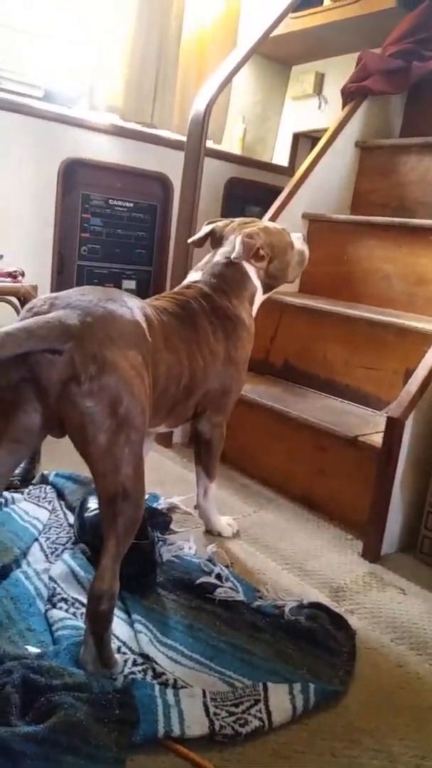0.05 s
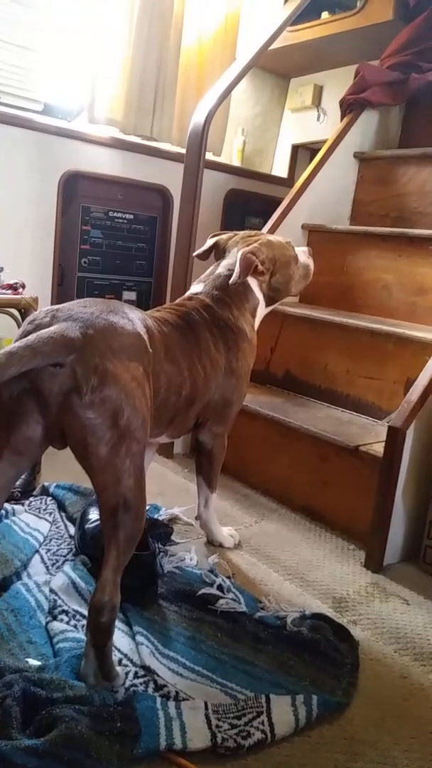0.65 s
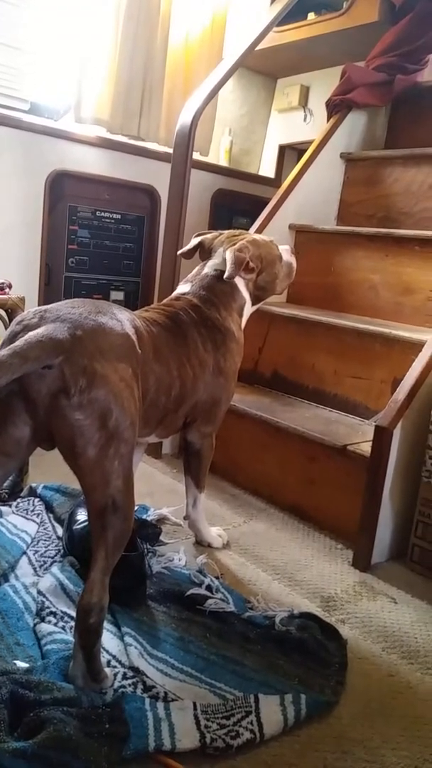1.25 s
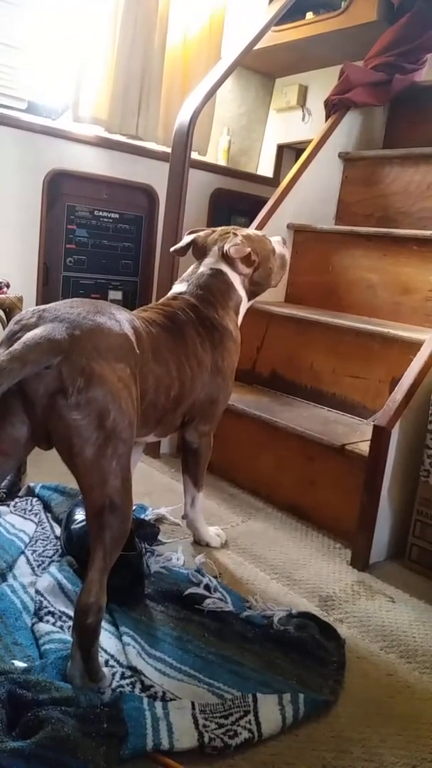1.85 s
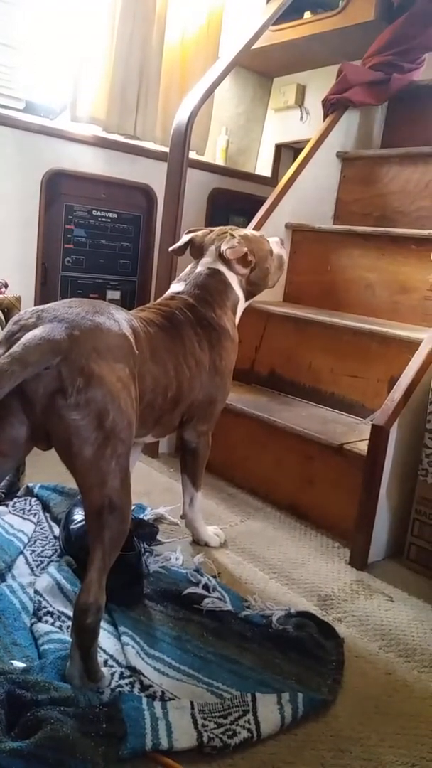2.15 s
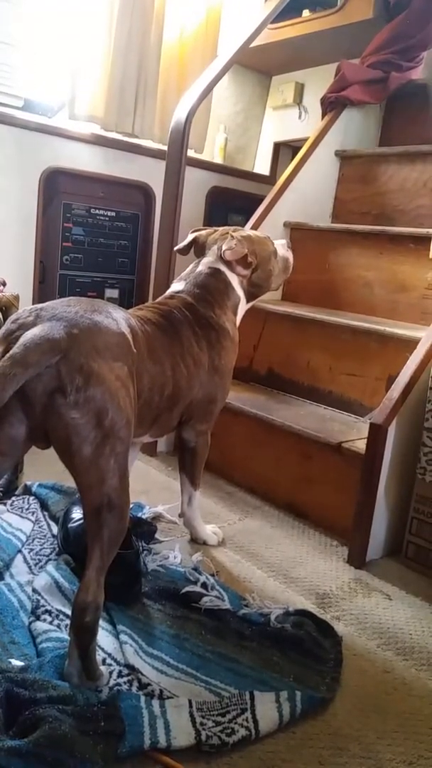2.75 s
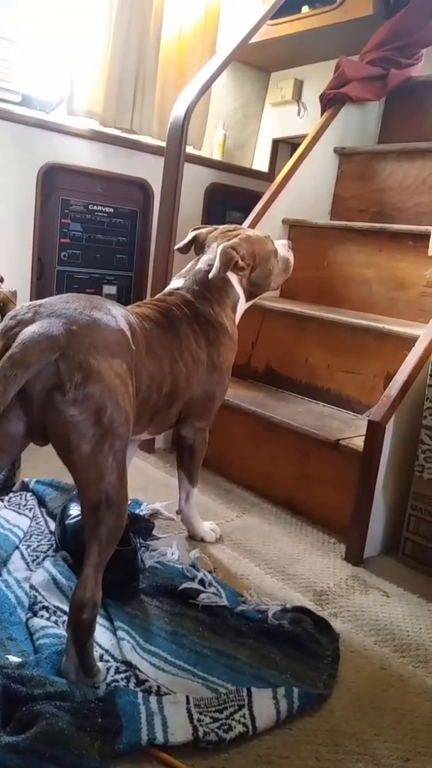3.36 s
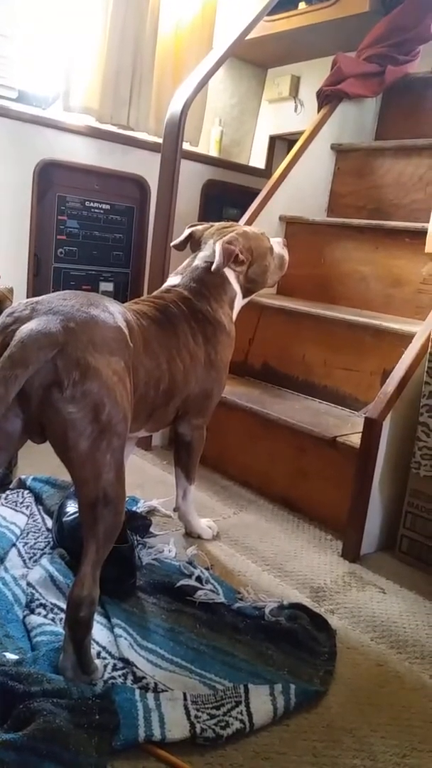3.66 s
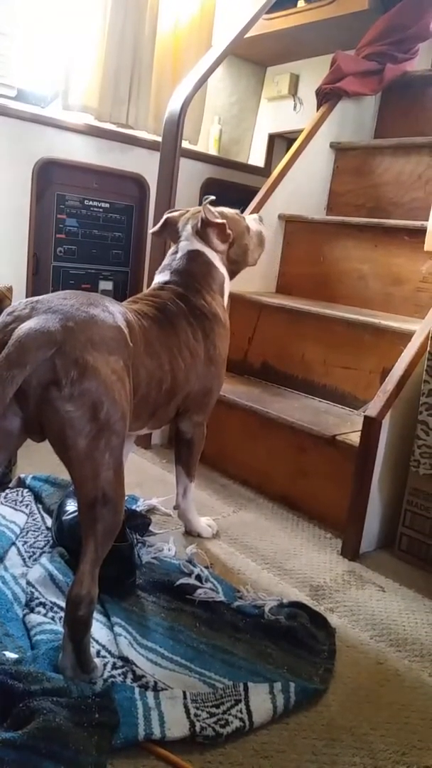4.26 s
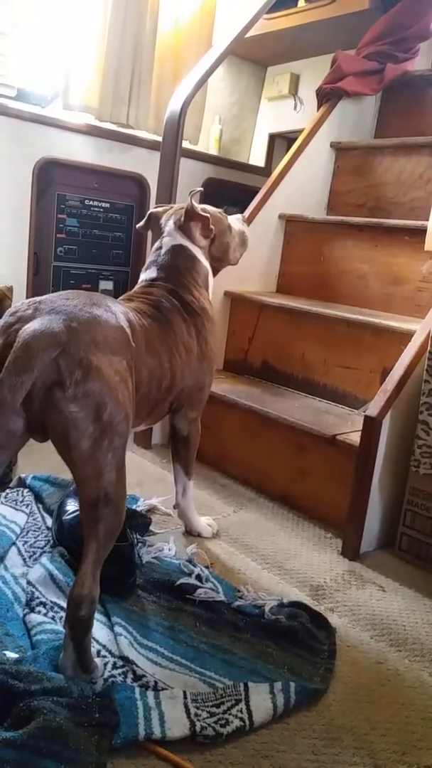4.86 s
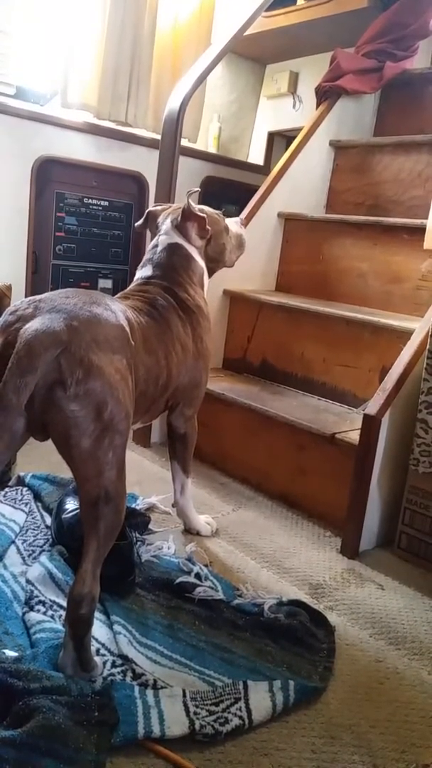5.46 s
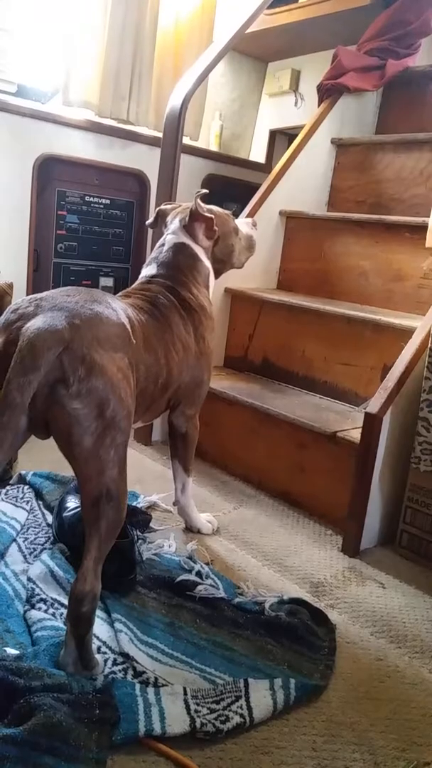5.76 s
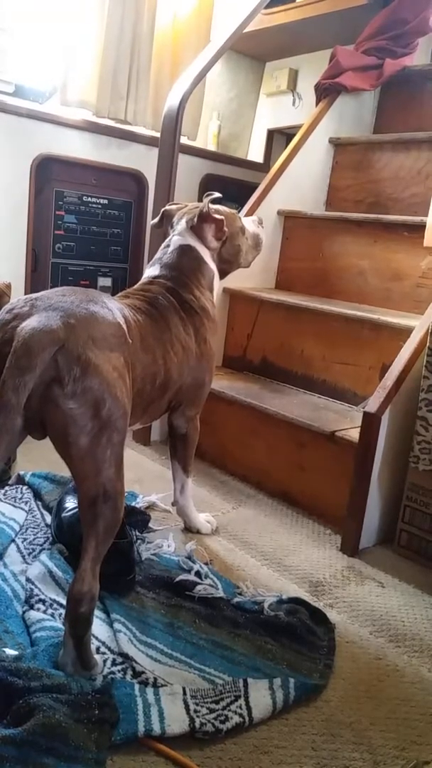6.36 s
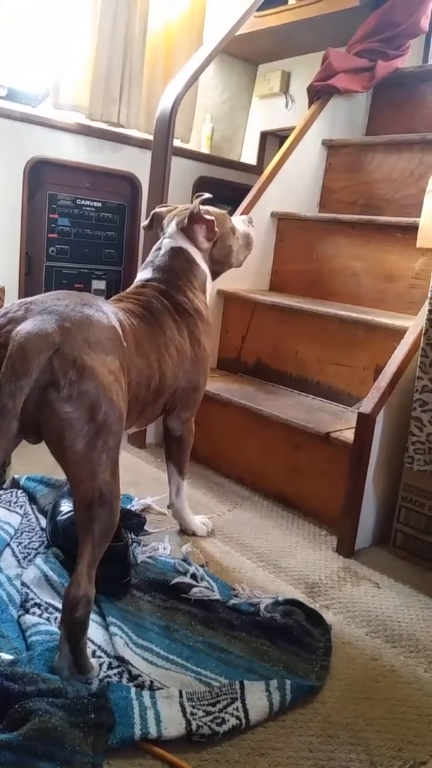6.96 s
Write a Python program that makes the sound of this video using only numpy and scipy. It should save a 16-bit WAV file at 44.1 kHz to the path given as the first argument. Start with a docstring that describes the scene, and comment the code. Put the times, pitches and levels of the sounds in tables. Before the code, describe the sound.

A low, steady generator hum fills a small, cushioned boat cabin, heard from inside. Wood creaks once at the start, and four irregular knocks crack on the woodwork, the third weaker than the others. Dull thuds come through the deck, with light clicks of fittings, faint rustles and some hollow snaps around the middle. Toward the end only soft thuds, clicks and rustles remain over the hum.

```python
"""Inside a wooden boat cabin, four sharp knocks and a few soft thuds come through the deck.
Each knock cracks on the woodwork and sets the deck ringing; the thuds ring mostly its low notes.
Small fittings click, wood creaks once, and there are hollow snaps, faint rustles and thin squeaks.
The small, cushioned cabin adds a short, dense ring to the cracks and clicks.
Behind the panelling a generator drones, its tones all tied to the speed of its shaft."""
import sys
import numpy as np
from scipy import signal
from scipy.fft import rfft, irfft
from scipy.io import wavfile

SR = 44100
rng = np.random.default_rng(int(sys.argv[2]) if len(sys.argv) > 2 else 0)


def unload_wav(signal):
    """Save mono or channel-first audio to the path in sys.argv[1] as 16-bit WAV at rate SR, clipped to [-1, 1]."""
    wavfile.write(
        sys.argv[1],
        SR,
        np.round(np.clip(np.atleast_2d(signal).T, -1, 1) * 32767).astype(np.int16),
    )


N = 317520  # 7.2 seconds
BLOW_TIME = np.arange(SR // 3) / SR  # seconds since a blow landed
FILTER_HZ = np.fft.rfftfreq(8192, 1 / SR)  # the frequencies at which a filter's gain is set

# The notes the deck rings at. Each row: pitch in Hz, level in dB, seconds to fade by 60 dB.
DECK_NOTES = [(90, -6, 0.26), (133, -6, 0.1), (178, -8.5, 0.43), (247.3, -4, 0.47), (275, 2.5, 0.18),
              (363, -13, 0.3), (419.5, -1.5, 0.14), (485, -1, 0.14), (591, -10.5, 0.31), (743, 5.5, 0.11),
              (951, 6.5, 0.098), (1162, 1.5, 0.07), (1380, -15, 0.1), (1630, -12, 0.08), (1940, -1, 0.089),
              (2630, -8, 0.07)]
# The tone colour of a small click. Each row: frequency in Hz, level in dB.
CLICK_COLOUR = [(300, -29), (900, 3), (1500, 8), (2700, 4), (3600, -7.5), (5000, -9.5), (6500, -5.5),
                (8000, -17), (10500, -21.5), (12500, -45), (16000, -42)]
# The faint rustles. Each row: start in seconds, length in seconds, level in dB.
RUSTLES = [(0, .2, -48), (.22, .3, -59.5), (1.71, .11, -51), (1.939, 0.35, -56.5), (2.386, 0.31, -54),
           (2.72, 0.32, -62), (3.079, 0.27, -56), (5.726, .1, -53.5), (5.933, .08, -52),
           (6.488, 0.14, -58.5), (6.81, .09, -58)]


def knocks(spot_db=6, panel_db=5):
    """A knock is two or three quick contacts; each cracks through the cabin and pushes the deck."""
    # The contacts. Each row: start in seconds, crack level in dB, frequency in Hz above which the treble
    # fades (lower is softer), pitch of the struck spot in Hz, level of the deck's ring in dB.
    contacts = [(0.6389, -25.5, 2100, 920, -50), (0.6418, -16, 2780, 1930, -28.5),
                (.649, -26.5, 500, 356, -27), (2.4803, -17, 2160, 1240, -41), (2.484, -23, 2900, 1230, -37),
                (2.4882, -18.5, 2500, 2680, -25), (3.7687, -35.5, 1490, 1800, -29.5),
                (3.7756, -30, 980, 740, -32.5), (4.7662, -22, 1700, 1190, -39),
                (4.7716, -25, 1090, 500, -19)]
    # The tone colour of a crack on wood. Each row: frequency in Hz, level in dB.
    wood_colour = [(110, -24.5), (170, 3), (380, -4), (600, -4.5), (800, -0.5), (1150, 3.5), (2050, 4),
                   (2650, 1.5), (3200, -3.5), (4500, -7.5), (6700, -3.5), (7800, -9.5), (10500, -12.5),
                   (15000, -48)]
    panel_peaks = sum(resonance(FILTER_HZ, hz, width_hz=40) for hz, _, _ in DECK_NOTES)
    wood_db = curve_at(wood_colour, FILTER_HZ) + panel_db * panel_peaks
    out = np.zeros(N)
    for start, crack_db, corner_hz, spot_hz, deck_db in contacts:
        treble_loss_db = 10 * np.log10(1 + (FILTER_HZ / corner_hz) ** 3.54)
        spot_peak = resonance(FILTER_HZ, spot_hz, width_hz=0.28 * spot_hz)
        echo = cabin_echo(direct=0.3, early_db=1, early_s=0.006)
        crack = filtered(echo, wood_db - treble_loss_db + spot_db * spot_peak)
        add(out, start, gain_of(crack_db) * unit_blow(crack))
        add(out, start, gain_of(deck_db) * deck_ring(contact_s=0.00009))
    return out


def thuds():
    """Slow pushes on the deck ring mostly its lowest notes."""
    # The soft pushes. Each row: start in seconds, level in dB, contact time in seconds.
    pushes = [(.17, -35.5, 0.00016), (1.793, -27.5, 0.0015), (2.505, -25.5, 0.00029), (2.611, -46, 0.0018),
              (3.271, -34.5, 0.00034), (3.786, -28.5, 0.0013), (4.768, -31, 0.00071),
              (5.648, -31.5, 0.00056), (5.697, -35, 0.00049), (5.741, -37, 0.00033), (6.53, -36, .0015)]
    out = np.zeros(N)
    for start, db, contact_s in pushes:
        add(out, start, gain_of(db) * deck_ring(contact_s))
    return out


def deck_ring(contact_s):
    """A push sets the deck's notes ringing; the longer the contact, the duller the sound."""
    ring = sum(gain_of(db - 60 * BLOW_TIME / fade_s) * np.sin(2 * np.pi * hz * BLOW_TIME)
               for hz, db, fade_s in DECK_NOTES)
    push = BLOW_TIME * np.exp(-BLOW_TIME / contact_s)
    return unit_blow(signal.fftconvolve(ring, push)[:len(BLOW_TIME)])


def fittings():
    """Small fittings click here and there."""
    # The clicks. Each row: start in seconds, level in dB, added brightness in dB per octave.
    taps = [(.045, -45, 5.5), (.107, -34.5, 4), (.132, -35.5, 2.5), (.149, -46, 3), (.522, -40.5, 1.5),
            (1.193, -44, 0), (1.208, -33.5, 1.5), (1.2551, -34.5, 5.5), (1.402, -48, -2),
            (1.464, -38.5, -0.5), (1.742, -47, 4), (1.786, -42, -2), (2.44, -42.5, 0), (2.61, -56, 15),
            (2.635, -49.5, 6), (2.762, -53, 6), (2.81, -47, -9), (3.146, -53, 10), (3.245, -44.5, -3),
            (4.7645, -40.5, 6.5), (5.615, -45, -3), (5.652, -48.5, 0.5), (5.8, -40, 2.5), (5.927, -39, 6.5)]
    return clicks(taps, CLICK_COLOUR)


def snaps():
    """Four clicks with a hollow, wet-sounding tone."""
    # The snaps. Each row: start in seconds, level in dB, added brightness in dB per octave.
    taps = [(3.268, -39.5, 0), (4.151, -46.5, -3.5), (4.246, -52, 1.5), (4.311, -36, -2.5)]
    # Their tone colour. Each row: frequency in Hz, level in dB.
    snap_colour = [(300, -25), (1100, -10), (1650, 0.5), (2800, -9), (3400, -22), (5200, -21), (5950, -4),
                   (6700, -6), (8100, -26), (9200, -12), (10600, -24), (12500, -38)]
    return clicks(taps, snap_colour)


def clicks(taps, colour):
    """Light, hard contacts ring the wood a little and are heard mostly by their first echoes."""
    # Hollow resonances of the wood nearby. Each row: pitch in Hz, width in Hz, boost in dB.
    hollows = [(1420, 180, 4.5), (2020, 130, 3), (2580, 250, 3)]
    hollow_db = sum(db * resonance(FILTER_HZ, hz, width_hz) for hz, width_hz, db in hollows) - 1.5
    colour_db = curve_at(colour, FILTER_HZ) + hollow_db
    octaves = np.log2(np.maximum(FILTER_HZ, 1200) / 3000)
    out = np.zeros(N)
    for start, db, brightness in taps:
        echo = cabin_echo(direct=0.12, early_db=3.5, early_s=0.02)
        click = filtered(echo, colour_db + brightness * octaves)
        add(out, start, gain_of(db) * unit_blow(click))
    return out


def creak():
    """Wood slips in jerks; each jerk rings one resonance."""
    # The jerks of one short creak. Each row: start in seconds, level in dB, pitch in Hz.
    jerks = [(.084, -44, 2300), (.106, -35.5, 2350), (.131, -42, 2300), (.141, -49, 1700),
             (.151, -37, 1260), (0.1637, -44, 2580), (.175, -38.5, 1580)]
    out = np.zeros(N)
    for start, db, hz in jerks:
        colour_db = 16 * np.log10(resonance(FILTER_HZ, hz, 450))  # 16 rather than 10 narrows the peak
        echo = cabin_echo(direct=0.57, early_db=10, early_s=0.0053)
        add(out, start, gain_of(db) * unit_blow(filtered(echo, colour_db)))
    return out


def rustle(rise_s=0.028, fall_s=0.066, grain_db=1.0):
    """Short swells of grainy hiss rise, hold and die away."""
    # The tone colour of the hiss. Each row: frequency in Hz, level in dB.
    hiss_colour = [(800, 9.5), (2500, 13), (4500, 0.5), (6600, 6), (8000, -5.5), (10000, -0.5),
                   (12200, -20), (16000, -16)]
    t = np.arange(N) / SR
    swells = np.zeros(N)
    for start, length_s, db in RUSTLES:
        rise = np.clip((t - start) / rise_s, 0, 1)
        fall = np.clip((start + length_s - t) / fall_s + 0.5, 0, 1)
        swells += gain_of(db) * rise * fall
    grain = gain_of(grain_db * drift(rate_hz=25))
    return swells * grain * unit_level(noise(hiss_colour))


def ticks(per_second=5, offset_db=-1, spread_db=3, brightness=7):
    """Tiny clicks fall at random within the longer rustles and follow their strength."""
    taps = []
    for start, length_s, rustle_db in RUSTLES:
        for place, size in rng.random((round(per_second * length_s), 2)):
            db = rustle_db + offset_db + spread_db * (2 * size - 1)
            taps.append((start + length_s * place, db, brightness))
    return clicks(taps, CLICK_COLOUR)


def squeaks(width_hz=120):
    """Narrow bands of noise make brief, rough whistles that swell and fade."""
    # The thin squeaks. Each row: start in seconds, length in seconds, pitch in Hz, level in dB.
    whistles = [(.41, .045, 8480, -68), (2.83, 0.072, 8480, -76), (2.925, 0.027, 12900, -66),
                (3.125, .07, 13000, -74), (4.92, .06, 8470, -73)]
    out = np.zeros(N)
    for start, length_s, hz, db in whistles:
        t = np.arange(0, length_s, 1 / SR)
        band = np.sqrt(resonance(np.fft.rfftfreq(len(t), 1 / SR), hz, width_hz))
        whistle = irfft(rfft(rng.standard_normal(len(t))) * band, len(t))
        swell = np.sin(np.pi * t / length_s)
        add(out, start, gain_of(db) * unit_level(swell * whistle))
    return out


def generator(shaft_hz=28.654, speed_wander=0.00035, waver_db=1.5, repeat_share=0.1):
    """The turning shaft makes gently wavering tones over the rumble and hiss of the machinery."""
    # The drone and its faint, high whine. Each row: multiple of the shaft speed, level in dB.
    drone = [(2, -48), (3, -53.5), (4, -48.5), (5, -59), (6, -40.5), (7, -51), (8, -49.5), (9, -58.5),
             (10, -53), (11, -50), (12, -45.5), (13, -51.5), (14, -45.5), (15, -68), (16, -58.5), (17, -63),
             (18, -58), (20, -56.5), (21, -67), (22, -64), (24, -59), (25, -57), (28, -58.5), (30, -63.5),
             (36, -83), (38, -61), (39, -75), (40, -81.5), (42, -69.5), (47, -68.5), (52, -76), (58, -64)]
    whine = [(90, -69.5), (112, -75.5), (128, -76), (218, -76), (222, -79), (228, -78), (232, -71),
             (246, -79.5)]
    # The machinery's rumble and its faint top hiss. Each row: frequency in Hz, level in dB per Hz.
    rumble = [(55, -67.5), (130, -67), (210, -64), (380, -68), (470, -74), (750, -76), (1250, -82),
              (1750, -82.5), (2700, -89.5), (3800, -96.5)]
    hiss = [(4800, -102), (6550, -96.5), (8000, -107), (10000, -110), (12000, -117), (16000, -115)]
    turns = np.cumsum(shaft_hz * (1 + speed_wander * drift(rate_hz=1.5))) / SR
    tones = np.zeros(N)
    for multiple, db in drone + whine:
        amplitude = np.sqrt(2) * gain_of(db + waver_db * drift(rate_hz=1.24))
        tones += amplitude * np.sin(2 * np.pi * (multiple * turns + rng.random()))
    # The clatter partly repeats at every firing, twice a turn, gathering some hiss into fine tones.
    hz = np.fft.rfftfreq(N, 1 / SR)
    comb = np.cos(np.pi * hz / (2 * shaft_hz)) ** 100
    share = repeat_share * ((hz > 1200) & (hz < 8000))
    comb_gain = np.sqrt(1 - share + share * comb / comb.mean())
    return tones + irfft(rfft(noise(rumble + hiss)) * comb_gain, N)


def cabin_echo(direct, early_db, early_s, thicken_s=0.032):
    """A blow arrives directly, then as separate echoes that thicken into a short, fading ring."""
    # How long the cabin rings. Each row: frequency in Hz, seconds to fade by 60 dB.
    ring_times = [(150, 0.13), (500, 0.27), (1200, 0.16), (2400, 0.18), (5000, 0.17), (11000, 0.069)]
    band_hz, fade_times = np.transpose(ring_times)
    count = len(BLOW_TIME)
    density = np.minimum(0.025 + (BLOW_TIME / thicken_s) ** 2, 1)
    echoes = rng.choice([-1, 1], count) * (rng.random(count) < density) / np.sqrt(density)
    hz = np.fft.rfftfreq(count, 1 / SR)
    ring = np.zeros(count)
    for one_band, fade_s in zip(np.eye(len(band_hz)), fade_times):
        band = irfft(rfft(echoes) * curve_at(np.c_[band_hz, one_band], hz), count)
        ring += band * gain_of(-60 * BLOW_TIME / fade_s)
    ring *= 1 + gain_of(early_db) * np.exp(-BLOW_TIME / early_s)  # the first echoes are stronger
    ring /= np.linalg.norm(ring)
    ring[0] += direct
    return ring


def gain_of(db):
    """Turns decibels into a number to multiply a sound by."""
    return 10 ** (np.asarray(db) / 20)


def unit_level(x):
    """Scales a signal to an average (rms) level of one."""
    return x / np.sqrt(np.mean(x ** 2) + 1e-20)


def unit_blow(x):
    """Scales a blow so that its energy, spread over a fiftieth of a second, gives a level of one."""
    return x / np.sqrt(np.sum(x ** 2) / (SR / 50) + 1e-20)


def curve_at(points, hz):
    """Joins (frequency, value) points along a scale of octaves and gives the value at hz."""
    point_hz, values = np.transpose(points)
    return np.interp(np.log(hz + 1), np.log(point_hz), values)


def resonance(hz, centre_hz, width_hz):
    """A bell-shaped peak that reaches one at its centre."""
    return 1 / (1 + (2 * (hz - centre_hz) / width_hz) ** 2)


def add(mix, start, sound):
    """Mixes a sound in at a start time in seconds."""
    part = mix[max(round(start * SR), 0):][:len(sound)]
    part += sound[:len(part)]


def noise(colour):
    """Noise with the given tone colour in dB per Hz."""
    shape = gain_of(curve_at(colour, np.fft.rfftfreq(N, 1 / SR)))
    return irfft(rfft(rng.standard_normal(N)) * shape, N) * np.sqrt(SR / 2)


def drift(rate_hz, count=300):
    """A random wander with a level of one, mostly slower than rate_hz."""
    hz = np.arange(count) * SR / N
    spectrum = rng.standard_normal(count) + 1j * rng.standard_normal(count)
    return unit_level(irfft(spectrum * (hz > 0) / (1 + (hz / rate_hz) ** 2), N))


def filtered(x, db):
    """Shapes a sound by a gain in dB at each of FILTER_HZ, keeping its start sharp."""
    cepstrum = irfft(np.log(gain_of(np.maximum(db, -100))))
    # Folding the second half onto the first makes the filter ring only after a blow, never before.
    cepstrum[1:len(FILTER_HZ) - 1] *= 2
    cepstrum[len(FILTER_HZ):] = 0
    response = irfft(np.exp(rfft(cepstrum)))
    return signal.fftconvolve(x, response)[:len(x)]


def scene():
    """Everything heard in the cabin, in mono."""
    small_sounds = fittings() + snaps() + creak() + rustle() + squeaks()
    return (generator() + knocks() + thuds() + small_sounds + ticks())[None]


def record(dry, low_cut_hz=50, high_cut_hz=15800):
    """Steeply cuts away the deepest bass and the highest treble."""
    low_cut = signal.butter(8, low_cut_hz, "high", fs=SR, output="sos")
    high_cut = signal.firwin(511, high_cut_hz, window=("kaiser", 9), fs=SR)
    return signal.oaconvolve(signal.sosfilt(low_cut, dry), high_cut[None], "same")


dry = scene()
out = record(dry)
unload_wav(out)
```